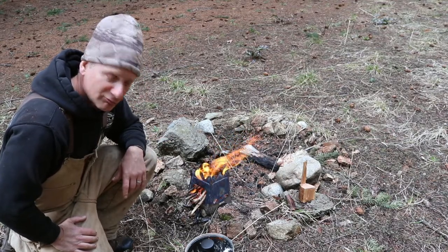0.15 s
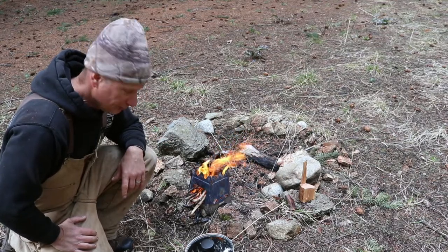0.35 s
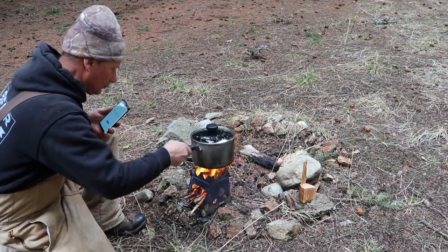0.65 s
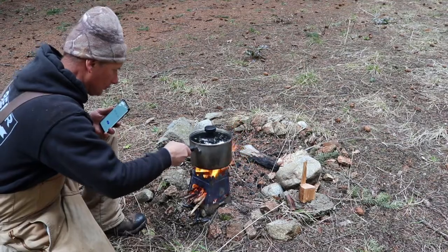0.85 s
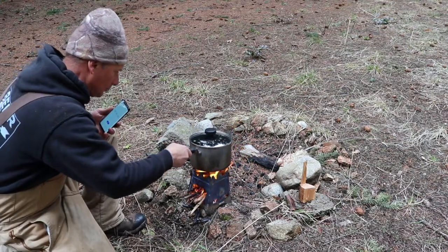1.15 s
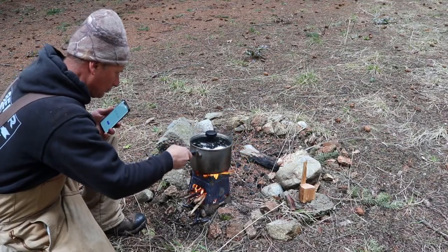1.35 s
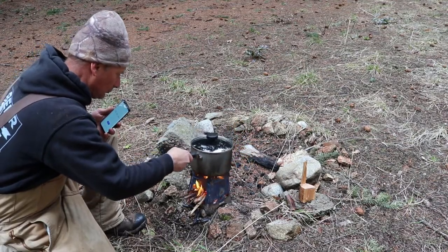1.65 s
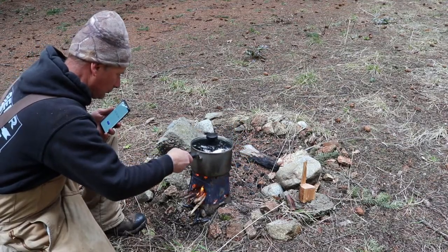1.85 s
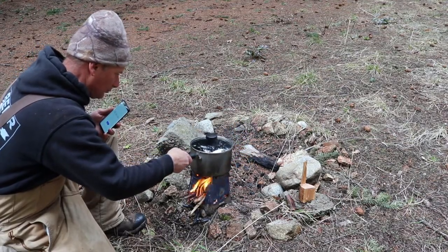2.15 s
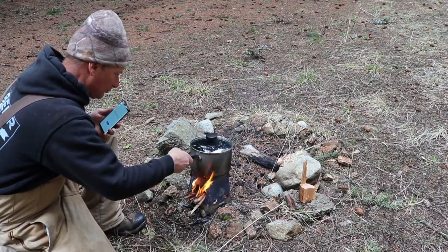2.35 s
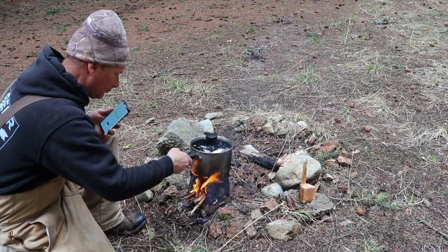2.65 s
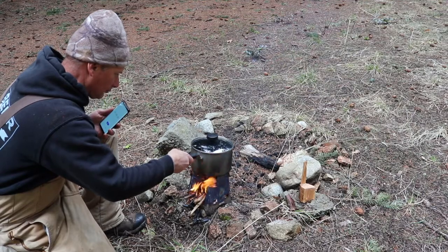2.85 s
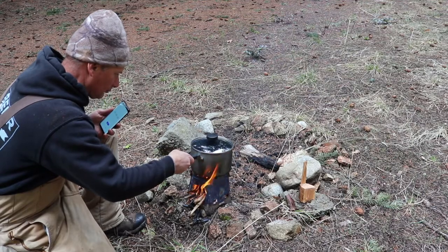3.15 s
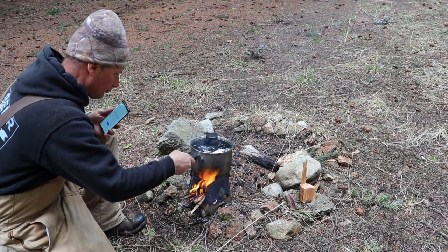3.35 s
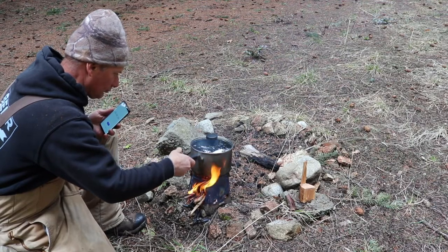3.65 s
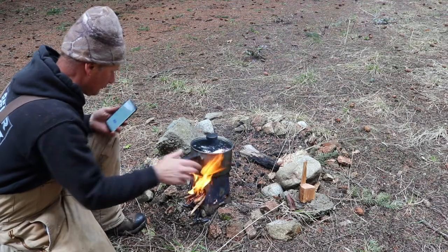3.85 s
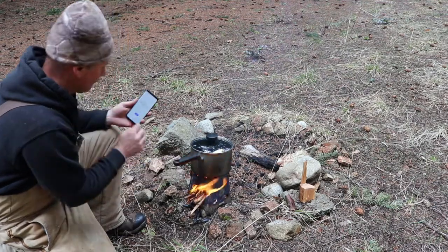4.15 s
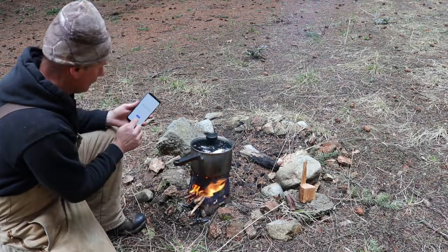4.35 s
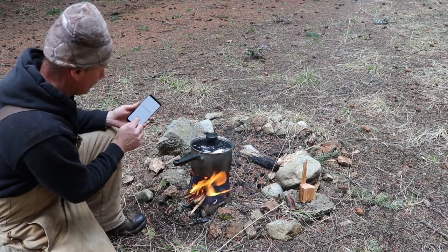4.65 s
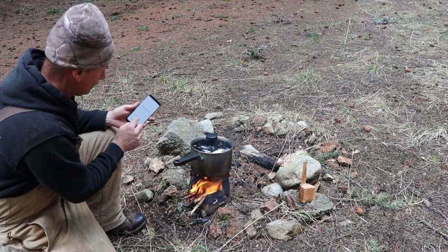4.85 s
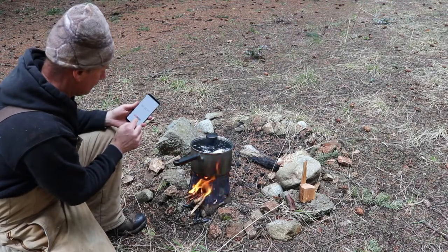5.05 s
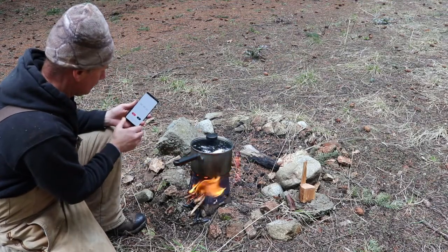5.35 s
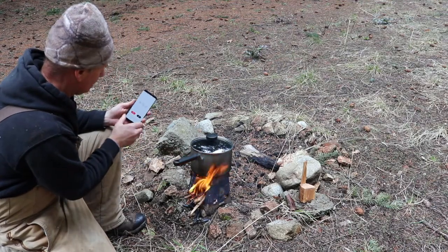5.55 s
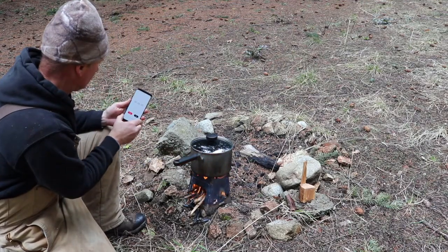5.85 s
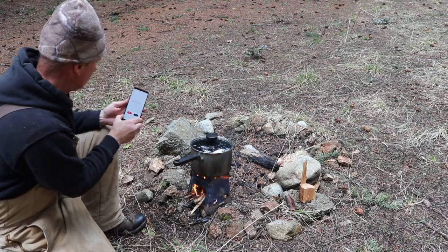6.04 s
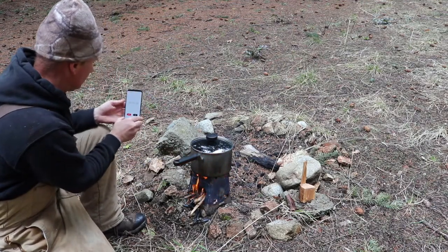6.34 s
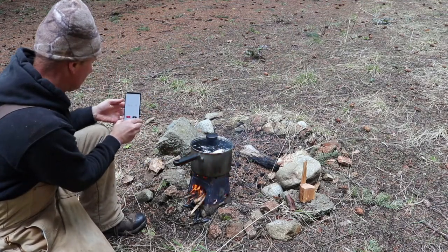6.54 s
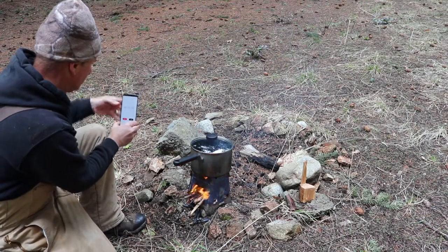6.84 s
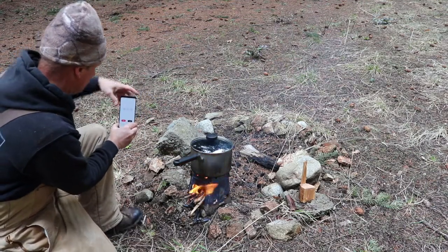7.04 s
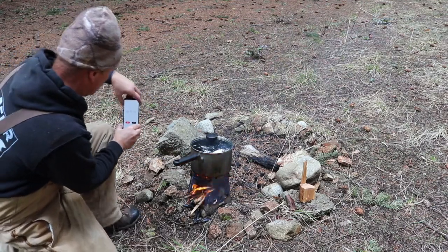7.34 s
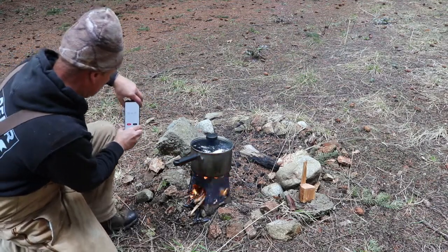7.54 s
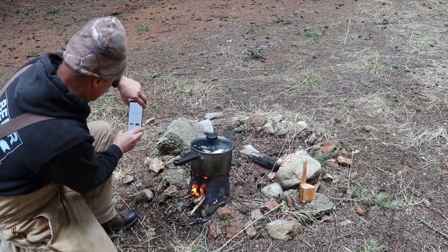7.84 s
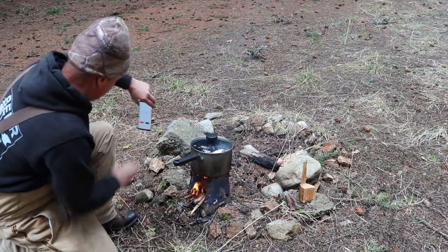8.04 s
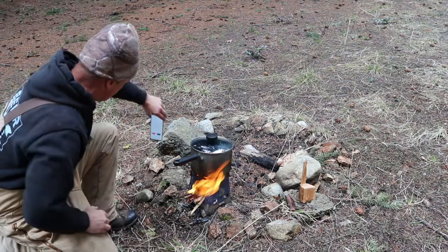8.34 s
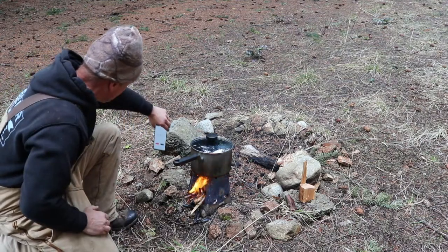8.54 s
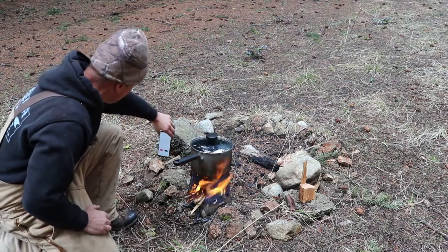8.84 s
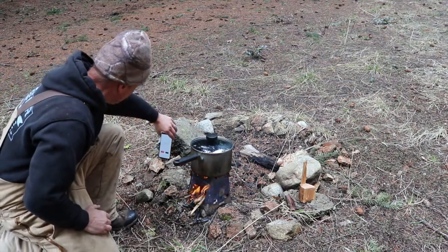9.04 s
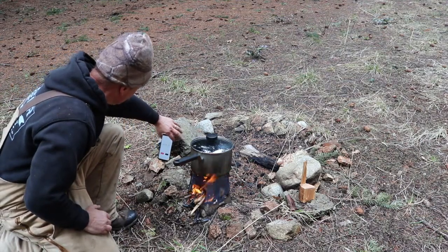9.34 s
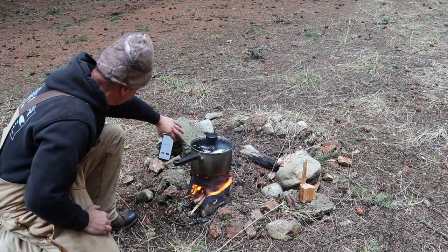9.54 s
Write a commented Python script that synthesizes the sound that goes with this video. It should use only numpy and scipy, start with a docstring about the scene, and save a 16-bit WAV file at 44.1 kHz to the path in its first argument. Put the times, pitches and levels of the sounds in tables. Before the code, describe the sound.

A small twig fire burns in a metal stove under a pot, heard close up outdoors among trees. Soft, low flame flutter and a smooth quiet hiss run throughout, with faint thin ticks. Sharp pops start at 0.3 s; the two loudest, at 0.4 and 1.0 s, are hard ringing thumps with crack and fizz. The pot jars faintly at 0.7 s, gives a clear damped double clunk at 1.6 s, and stirs barely at 2.9 s, amid tiny needle shuffles. Separate snaps follow at 3.0, 3.6, 4.2, 5.0, 5.3 and 5.7 s. From 6.2 to 7.8 s a longer crunchy, swishing shuffle peaks near 6.9 s, while pops crowd between 7.1 and 7.8 s. A faint pot tick comes at 7.8 s, then strong pops at 8.3 and 8.6 s with two short shuffles. Weaker crackles finish at 9.7 s over fuller low wind rumble.

```python
"""A small twig fire burns in a sheet-metal stove under a pot, on a forest floor near one microphone.
Over soft flames and a smooth hiss, the first strong sap pops come in the opening second, each a ringing
thump with noisy crack and fizz. The pot jars as damped metal modes in the first three seconds, amid short
shuffles in dry needles made of dense clicks. From 6.2 s a longer shuffle passes under a thicker run of pops,
the pot jars once more, and two short shuffles follow while the low wind rumble stands higher than at first."""
import sys
import numpy as np
from scipy import signal
from scipy.fft import rfft, irfft, next_fast_len
from scipy.io import wavfile

SR = 44100
rng = np.random.default_rng(int(sys.argv[2]) if len(sys.argv) > 2 else 0)


def unload_wav(signal):
    """Save mono or channel-first audio to the path in sys.argv[1] as 16-bit WAV at rate SR, clipped to [-1, 1]."""
    wavfile.write(
        sys.argv[1],
        SR,
        np.round(np.clip(np.atleast_2d(signal).T, -1, 1) * 32767).astype(np.int16),
    )


N = 427329  # length in samples

# Bursts of sap. Each row: start in seconds, thump level in dB, thump pitch in Hz, bass level in dB,
# crack level in dB, crack centre in Hz, fizz level in dB.
SAP_POPS = [(0.2175, -30, 1250, -53, -42, 2800, -59), (0.3096, -10.5, 1280, -39, -9, 3100, -8),
            (0.3404, -20.5, 1260, -47, -30, 3300, -25.5), (0.4148, 7, 1520, -8, -13, 3800, -9),
            (0.5864, -59, 1200, -39, -42, 2800, -28.5), (0.7315, -56, 1200, -57, -51, 3800, -39),
            (0.7913, -46, 1180, -52, -46, 3400, -38), (0.8639, -8, 1160, -16.5, -14, 2230, -9),
            (0.881, -30.5, 990, -21.5, -43, 2600, -55), (1.0027, -16, 1560, -38, -26, 2100, -28),
            (1.0222, 6, 1140, -5, -13, 2020, -11.5), (1.23, -52, 1200, -51, -63, 2600, -38),
            (1.3986, -54, 1200, -51, -66, 3200, -36), (1.5157, -37, 1130, -52, -66, 2300, -56),
            (1.682, -16.5, 1230, -29.5, -21, 3120, -26.5), (1.737, -56, 1200, -53, -40, 3700, -37),
            (1.8495, -44, 1120, -50, -46, 2500, -36), (1.8814, -30, 800, -36, -52, 3800, -44),
            (1.925, -36, 1120, -51, -46, 3400, -38), (2.1871, -54, 1200, -56, -41, 3580, -41),
            (2.317, -21, 1140, -40, -28, 2930, -23), (2.911, -22, 1190, -30, -31, 3800, -36),
            (2.945, -34, 1160, -52, -34, 3700, -23), (2.9627, -54, 1200, -55, -52, 4900, -21.5),
            (3.0105, -14, 1220, -23, -13, 3200, -3), (3.31, -29.5, 1260, -51, -32, 4200, -37.5),
            (3.5883, 0, 1230, -6.5, -22, 2200, -22.5), (4.2181, -12, 1180, -37, -16.5, 3760, -8),
            (4.241, -40, 1200, -63, -35, 3800, -26), (4.4858, -51, 1200, -48, -49, 2700, -38),
            (4.9877, -53, 1200, -50, -65, 2200, -37), (5.0089, -8, 1150, -18, -6, 3180, -6),
            (5.0623, -29, 1440, -58, -55, 2100, -54), (5.172, -54, 1200, -46, -56, 3600, -27.5),
            (5.3069, -8.5, 1140, -15.5, -8.5, 3200, -3.5), (5.6723, -4, 1190, -18, -8.5, 3400, -3),
            (5.702, -35, 1260, -56, -42, 2400, -47), (5.706, -58, 1200, -25, -52, 2600, -39),
            (6.2903, -44, 800, -52, -40, 3560, -54), (6.425, -34, 1420, -51, -37, 2500, -34.5),
            (6.4475, -31, 1650, -46, -38, 2100, -53), (6.4863, -39, 1920, -56, -35.5, 3500, -57),
            (6.559, -36, 1380, -43, -35, 2300, -33), (6.7438, -17.5, 1430, -49, -32, 2100, -37),
            (6.8138, -19.5, 1600, -43, -39, 2100, -19), (6.9754, -16.5, 1530, -37, -36, 2600, -25.5),
            (7.0917, -9, 1170, -20, -11, 2920, -5.5), (7.1425, -26.5, 1130, -42, -34, 2100, -31.5),
            (7.209, -45, 1200, -50, -33, 3300, -45), (7.3062, -29.5, 1520, -48, -28.5, 3300, -25.5),
            (7.3544, -4, 1240, -33, -3, 3300, -4), (7.365, -33, 1200, -50, -26, 3300, -25),
            (7.4938, -29, 800, -31, -26, 3400, -40), (7.5225, -1.5, 1256, -14.5, -5, 3130, -12),
            (7.5466, -37, 1560, -56, -31, 2300, -39), (7.5847, -35.5, 1490, -51, -31.5, 2300, -35.5),
            (7.6221, -35, 820, -55, -33, 2200, -60), (7.6364, -33.5, 1220, -25.5, -24.5, 3400, -22),
            (7.7528, -16, 1310, -44, -20.5, 3120, -23), (7.7605, -40, 1200, -55, -31, 3300, -27),
            (8.2974, -8.5, 1210, -16, -11, 3330, -12.5), (8.3583, -38, 1120, -55, -41, 2500, -29),
            (8.5306, -27.5, 1210, -52, -29.5, 3530, -29.5), (8.55, -50, 1200, -54, -33, 2800, -42),
            (8.5718, -33, 1050, -34, -41, 4500, -46), (8.6015, -52, 1200, -54, -37, 2900, -49),
            (8.6349, -2.5, 1270, -12.5, -4, 3150, -1), (8.8537, -54, 1200, -54, -37.5, 3830, -33.5),
            (8.926, -50, 1200, -40, -62, 4900, -35), (9.037, -35, 1580, -34, -35, 2900, -36),
            (9.1617, -17.5, 1110, -26.5, -17, 2570, -35.5), (9.2155, -37, 800, -33, -61, 3100, -59),
            (9.3283, -45, 830, -48, -55, 2500, -34), (9.358, -19.5, 1240, -53, -17.5, 3300, -16),
            (9.5646, -20.5, 1230, -45, -24, 2780, -24), (9.609, -36.5, 1100, -26.5, -44, 2900, -51),
            (9.6402, -23.5, 1280, -52, -30, 3030, -38)]
# The pot jars on the stove. Each row: start in seconds, scrape level in dB, knock pitch in Hz,
# knock level in dB, scrape decay T60 in seconds, brightness in dB (per octave about 1200 Hz for the modes).
POT_JARS = [(0.677, -34, 1450, -29, 0.17, 9), (1.572, -22.5, 1075, -15.5, 0.12, 4.5),
            (1.609, -24.5, 1388, -13, 0.22, 2.5), (2.85, -37, 905, -42, 0.42, -4.5),
            (7.819, -34, 1300, -29.5, 0.14, 10.5)]
# Modes of the pot and stove walls. Each row: pitch in Hz, width in Hz, relative level in dB.
METAL_MODES = [(300, 130, -3.5), (550, 150, -25), (1050, 130, 6), (1300, 100, 6), (1650, 96, 1.5),
               (2200, 750, -3), (3200, 520, -8), (3800, 200, -15.5), (3940, 140, -25), (7360, 280, -28)]
# Short movements of boots and cloth. Each row: start in seconds, length in seconds,
# crunch level in dB, swish level in dB.
SHORT_SHUFFLES = [(-.2, .42, -47, -64), (1.72, .1, -47, -56), (2.81, .2, -50, -54), (3.12, .16, -50, -61),
                  (3.9, .32, -46, -56), (8.23, .22, -46, -52), (8.66, .15, -52, -53)]
# One longer movement, as a curve. Each row: time in seconds, crunch level in dB, swish level in dB.
LONG_SHUFFLE_CURVE = [(6.2, -70, -75), (6.42, -49, -62), (6.64, -50, -60), (6.7, -35, -53),
                      (6.78, -29, -46), (6.9, -26, -44), (6.96, -29, -44), (6.99, -37, -47),
                      (7.04, -32.5, -41), (7.12, -40, -47), (7.2, -49, -55), (7.29, -40, -50),
                      (7.44, -38.5, -46.5), (7.5, -40, -47), (7.57, -50, -62), (7.75, -53, -60),
                      (7.85, -70, -75)]
# Spectrum of crunching needles. Each row: frequency in Hz, relative density in dB per Hz.
NEEDLE_SPECTRUM = [(88, -56), (150, -35), (274, -18), (300, -19.5), (418, -12.5), (565, -9), (618, -13),
                   (862, -9), (1180, -9), (1400, -6), (1550, 0.5), (1720, -9.5), (3450, -11.5),
                   (4390, -19.5), (4880, -34), (5500, -27), (7150, -61), (12100, -120)]
# Spectrum of swishing cloth. Each row: frequency in Hz, relative density in dB per Hz.
CLOTH_SPECTRUM = [(2650, -32), (4500, 3), (4700, -2), (5530, -4), (6290, -9), (7450, -0.5), (10400, -5),
                  (11500, -1), (16000, -15)]
# Loudness of the flames. Each row: time in seconds, level in dB.
FLAME_LEVELS = [(0, -41.5), (.27, -45.3), (1.8, -45.5), (4, -44.5), (5, -44.2), (5.8, -46.2), (6.8, -44.8),
                (7.1, -41.5), (7.4, -43.8), (8.45, -43.2), (8.65, -46.3), (9.2, -43.7), (9.69, -44.3)]
# Spectrum of the flames' flutter. Each row: frequency in Hz, relative density in dB per Hz.
FLAME_SPECTRUM = [(88, -45), (150, -21.5), (291, -4), (325, -4), (409, -2), (449, -2.5), (681, -3.5),
                  (735, -5), (807, -4.5), (885, -6), (1430, -12), (1770, -17.5), (6000, -41), (7800, -77),
                  (13200, -120)]
# Flames flap in a draught. Each row: centre in seconds, level in dB.
FLAME_FLAPS = [(.89, -45), (1.42, -45), (2.59, -54), (3.07, -58), (4.05, -55), (5.37, -49), (6.6, -57),
               (7.05, -51), (7.7, -53), (8.35, -48), (8.6, -48), (9.23, -51), (9.68, -49)]
# Loudness of the wind. Each row: time in seconds, level in dB.
WIND_LEVELS = [(0, -62), (.9, -63), (1.2, -68), (2.2, -63), (3.1, -65), (3.5, -58), (4.07, -64), (4.6, -53),
               (5.1, -55), (5.9, -61), (6.5, -53), (7, -49), (7.3, -53), (8, -47), (8.7, -54), (9.2, -55),
               (9.69, -52)]
# Spectrum of wind at the microphone. Each row: frequency in Hz, relative density in dB per Hz.
WIND_SPECTRUM = [(15, 9), (30, 11), (60, 8), (110, -3.5), (250, -39)]
# Spectrum of the smooth hiss. Each row: frequency in Hz, relative density in dB per Hz.
HISS_SPECTRUM = [(1500, -41), (2500, -3.5), (6000, -9.5), (10000, -10), (15700, -12.5), (15900, -46.5)]
# Bands lost on the path from stove to microphone. Each row: centre in Hz, sharpness as Hz over width.
PATH_DIPS = [(4700, 15.4), (6300, 14.8)]
# Noise of each channel's amplifier. Each row: frequency in Hz, relative density in dB per Hz.
AMPLIFIER_SPECTRUM = [(29, -43), (50, -13.5), (228, -5), (283, -3), (446, -0.5), (541, 0.5), (919, -1),
                      (13900, -10), (15700, -14)]

THUMP_T60_S, LONGER_S_PER_DB = .008, .00018  # ring of a 0 dB thump; fainter ones ring longer
TICKS_PER_S, TICKS_DB = 7.5, -49  # faint crackle between the pops
ECHO_DELAY_S, ECHO_DB, ECHO_T60_S = .044, -34.5, .12
PEAK_AT, STEEPNESS = .4, 1.3  # share of a short shuffle before its top; exponent of its swell
FLAP_S, CALM_DB = .07, -60  # half-width of a flap; the low flutter between flaps
HISS_DB, AMPLIFIER_DB = -58, -57.5
EDGE_HZ = 16400  # upper band limit


def amp(db):
    """Turns dB into an amplitude factor."""
    return 10 ** (np.asarray(db) / 20)


def evened(x):
    """Scales a sound to rms 1."""
    return x / np.sqrt(np.mean(x ** 2) + 1e-20)


def add(mix, s, sound):
    """Lays a sound into the mix at a time in seconds, cut off at the mix's end."""
    part = mix[round(s * SR):][:len(sound)]
    part += sound[:len(part)]


def band(x, lo_hz, hi_hz):
    """Keeps the band between two frequencies."""
    edges = [lo_hz, min(hi_hz, SR / 2.1)]
    return signal.sosfilt(signal.butter(2, edges, "band", fs=SR, output="sos"), x)


def coloured(x, points):
    """Multiplies the spectrum of x by a table's curve, interpolated over log frequency, and sets rms 1."""
    f, db = np.transpose(points)
    size = next_fast_len(len(x))
    hz = np.fft.rfftfreq(size, 1 / SR)
    gain = amp(np.interp(np.log(hz + 1), np.log(f + 1), db, -90, -90))
    return evened(irfft(rfft(x, size) * gain, size)[:len(x)])


def waver(rate_hz):
    """Random drift of rms 1: noise kept below a rate."""
    lowpass = signal.butter(2, rate_hz, fs=SR, output="sos")
    return evened(signal.sosfilt(lowpass, rng.standard_normal(N)))


def grit(per_s, spread_db):
    """Dense clicks of uneven size, at random moments."""
    size = amp(spread_db * np.minimum(rng.exponential(1, N), 4)) * rng.standard_normal(N)
    return size * (rng.random(N) < per_s / SR)


def burst(noise, shape):
    """Noise under a decay, with the energy of the decay itself."""
    shaped = noise * shape
    return shaped * np.linalg.norm(shape) / np.linalg.norm(shaped)


def pop(db, hz, bass_db, crack_db, crack_hz, fizz_db, noise):
    """A pressure step rings the stove's air; splinters crack and fizz, then scatter faintly off the stones."""
    t = np.arange(noise.shape[1]) / SR
    t60 = max(THUMP_T60_S - LONGER_S_PER_DB * db, .003)
    ring_decay = amp(-60 * t / t60) + amp(-17.5 - 60 * t / 0.02)
    thump = -np.sin(2 * np.pi * hz * t) * ring_decay
    bass = np.sin(2 * np.pi * 380 * t) * amp(bass_db - 60 * t / 0.015)
    scatter = amp(-32 - 60 * t / 0.05)

    # a few sharp swings open the crack
    swings = .7 * np.sin(2 * np.pi * crack_hz * t) * amp(-60 * t / .005)
    crack_noise = band(noise[0], crack_hz / 1.38, crack_hz * 1.19) - swings
    crack = burst(crack_noise, amp(-60 * t / 0.0097) + scatter)

    # the fizz of finer splinters builds up over about a millisecond
    fizz_shape = amp(-60 * t / 0.0096) * (1 - np.exp(-t / 0.00051))
    fizz = burst(band(noise[1], 5050, 12900), fizz_shape + scatter)
    rattle = burst(band(noise[2], 750, 2400), amp(-60 * t / 0.012) + scatter)

    body = amp(db) * (thump + amp(-11.5) * rattle)
    splinters = amp(crack_db) * crack + amp(fizz_db) * fizz
    attack = np.minimum(t / .00016, 1)
    return (body + bass + splinters) * attack


def sap_pops():
    """Places each burst of sap, with its deepest bass taken away."""
    out = np.zeros(N)
    noises = rng.standard_normal((len(SAP_POPS), 3, 1900))
    for (s, *settings), noise in zip(SAP_POPS, noises):
        add(out, s, band(pop(*settings, noise), 150, 18000))
    return out


def ticks():
    """Faint thin crackle: short noise bursts at random moments, in three bands."""
    out = np.zeros(N)
    t = np.arange(300) / SR
    for lo_hz in (1500, 3000, 6500):
        strikes = rng.random(N) < TICKS_PER_S / 3 / SR
        clicks = amp(TICKS_DB + 2.6 * rng.standard_normal(N)) * strikes
        tick = evened(band(rng.standard_normal(len(t)), lo_hz, 3.3 * lo_hz)) * amp(-60 * t / 0.011)
        out += signal.oaconvolve(clicks, tick)[:N]
    return out


def fire_at_microphone():
    """Pops and ticks, with narrow bands lost on the path from the stove."""
    fire = sap_pops() + ticks()
    for hz, sharpness in PATH_DIPS:
        fire = signal.lfilter(*signal.iirnotch(hz, sharpness, SR), fire)
    return fire


def trees(fire):
    """Trunks nearby throw the fire back as one dull slap and a short scattered tail."""
    t = np.arange(6000) / SR
    tail = rng.standard_normal(len(t)) * amp(-60 * t / ECHO_T60_S)
    tail = amp(ECHO_DB) * tail / np.linalg.norm(tail)
    tail[0] += amp(-37)  # the slap
    out = np.zeros(N + 2 * len(t))
    add(out, ECHO_DELAY_S, signal.oaconvolve(fire, band(tail, 700, 11700)))
    return out[:N]


def metal_ring(noise, bright_db):
    """Contact noise excites the damped modes of the metal, over a broad scratch."""
    ring = amp(-13 + bright_db) * evened(band(noise, 300, 13500))
    for hz, width, mode_db in METAL_MODES:
        r = np.exp(-np.pi * width / SR)  # pole radius: a wider mode dies sooner
        mode = signal.lfilter([1 - r], [1, -2 * r * np.cos(2 * np.pi * hz / SR), r * r], noise)
        tilt_db = bright_db * np.log2(hz / 1200)
        ring = ring + evened(mode) * amp(mode_db + tilt_db)
    return ring


def pot():
    """Each jar of the pot is a decaying sine knock together with a short scrape that rings the metal."""
    out, t = np.zeros(N), np.arange(8000) / SR
    noises = rng.standard_normal((len(POT_JARS), len(t)))
    for (s, scrape_db, knock_hz, knock_db, t60, bright_db), noise in zip(POT_JARS, noises):
        ring = band(metal_ring(noise, bright_db), 200, 16000)
        scrape = amp(scrape_db) * burst(ring, amp(-60 * t / t60))
        knock = amp(knock_db - 60 * t / 0.058) * np.sin(2 * np.pi * knock_hz * t)
        attack = np.minimum(t / 0.0017, 1)
        add(out, s, (scrape + knock) * attack)
    return out


def shuffles():
    """Boots crunch needles in countless small breaks; cloth swishes above them."""
    crunch = coloured(grit(6000, 2.6), NEEDLE_SPECTRUM)
    swish = coloured(grit(10000, 3.5), CLOTH_SPECTRUM)
    t = np.arange(N) / SR
    s, crunch_db, swish_db = np.transpose(LONG_SHUFFLE_CURVE)
    out = amp(np.interp(t, s, crunch_db, -120, -120)) * crunch
    out += amp(np.interp(t, s, swish_db, -120, -120)) * swish
    for s, length, crunch_db, swish_db in SHORT_SHUFFLES:
        # half a sine, leaned so that it swells faster than it dies away
        stroke = np.interp((t - s) / length, [0, PEAK_AT, 1], [0, np.pi / 2, np.pi])
        swell = abs(np.sin(stroke)) ** STEEPNESS
        out += swell * (amp(crunch_db) * crunch + amp(swish_db) * swish)
    return out * amp(1.5 * waver(40))


def level_curve(points):
    """Draws a level in dB through (time, dB) points."""
    return np.interp(np.arange(N) / SR, *np.transpose(points))


def flames():
    """Burning gas roars softly: coloured noise whose level flutters."""
    level_db = level_curve(FLAME_LEVELS) + 0.65 * waver(23)
    return coloured(rng.standard_normal(N), FLAME_SPECTRUM) * amp(level_db)


def flaps():
    """Flames flap in the draught: low noise swells in short rounded puffs."""
    t = np.arange(N) / SR
    draught = amp(CALM_DB)
    for s, db in FLAME_FLAPS:
        draught = draught + amp(db) * np.exp(-((t - s) / FLAP_S) ** 2)
    return evened(band(rng.standard_normal(N), 90, 280)) * draught * amp(2.5 * waver(20))


def wind():
    """Light wind rumbles at the microphone: deep noise that comes in lumps."""
    level_db = level_curve(WIND_LEVELS) + 2.2 * waver(7)
    return coloured(rng.standard_normal(N), WIND_SPECTRUM) * amp(level_db)


def hiss():
    """A smooth, steady noise lies under all."""
    return amp(HISS_DB) * coloured(rng.standard_normal(N), HISS_SPECTRUM)


def scene():
    """One microphone feeds both channels."""
    fire = fire_at_microphone()
    foreground = fire + trees(fire) + pot() + shuffles()
    background = flames() + flaps() + wind() + hiss()
    return np.tile(foreground + background, (2, 1))


def record(dry):
    """Each channel adds its own amplifier noise and clips at full scale; then comes the band limit."""
    noise = np.array([coloured(row, AMPLIFIER_SPECTRUM) for row in rng.standard_normal((2, N))])
    clipped = np.clip(dry + amp(AMPLIFIER_DB) * noise, -1, 1)
    lowpass = signal.firwin(511, EDGE_HZ, window=("kaiser", 9), fs=SR)
    return signal.oaconvolve(clipped, lowpass[None], "same")


dry = scene()
out = record(dry)
unload_wav(out)
```